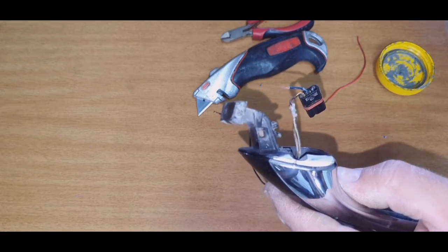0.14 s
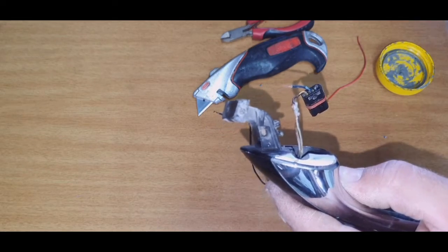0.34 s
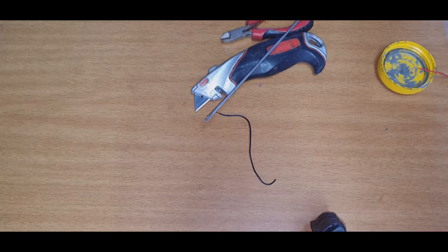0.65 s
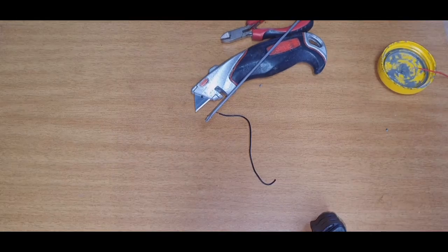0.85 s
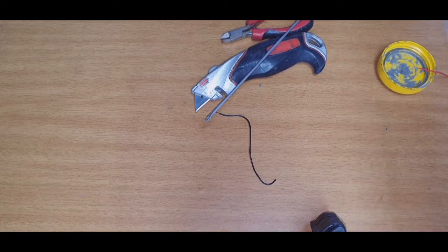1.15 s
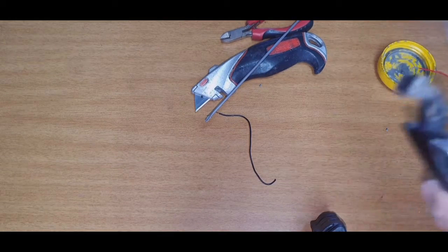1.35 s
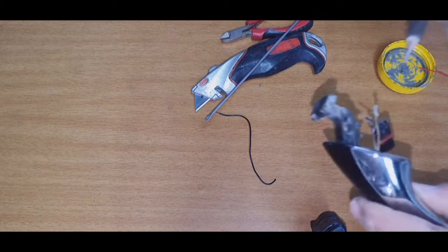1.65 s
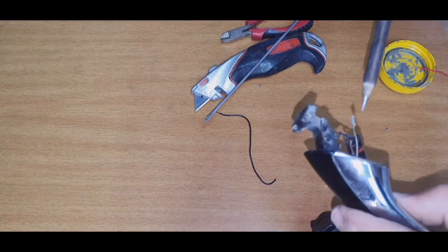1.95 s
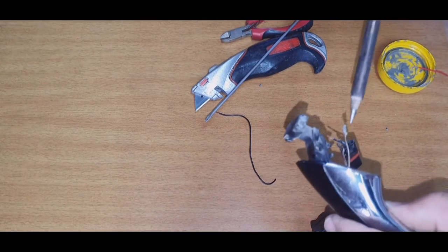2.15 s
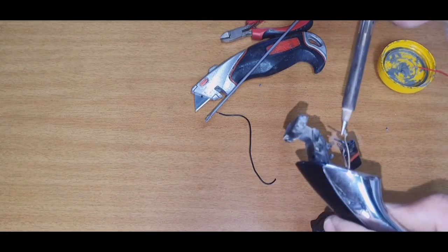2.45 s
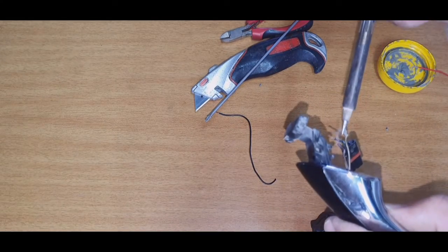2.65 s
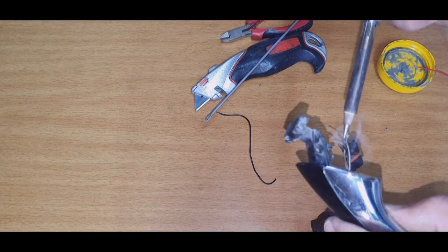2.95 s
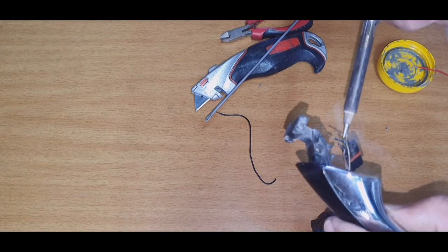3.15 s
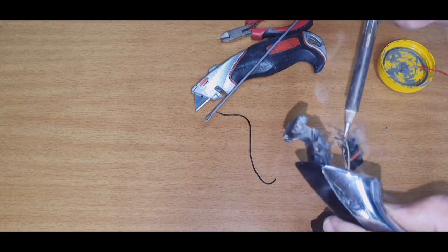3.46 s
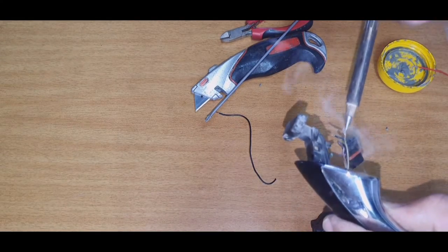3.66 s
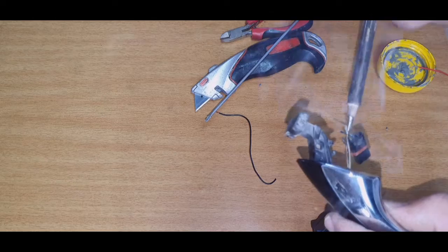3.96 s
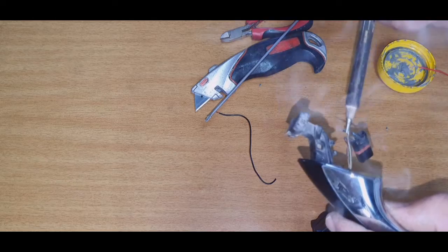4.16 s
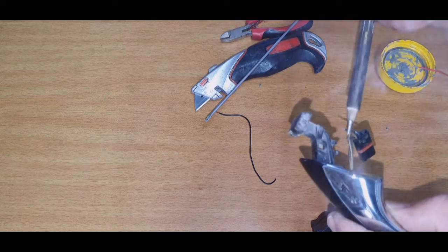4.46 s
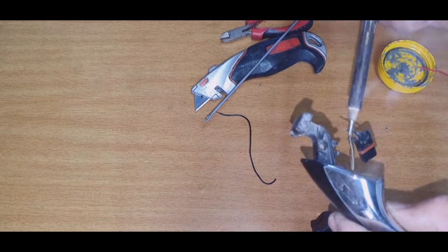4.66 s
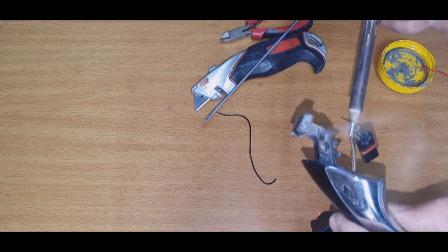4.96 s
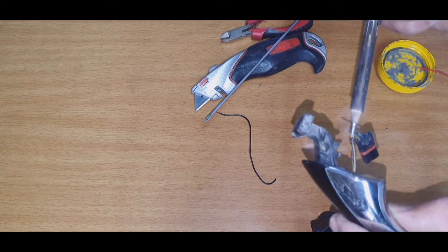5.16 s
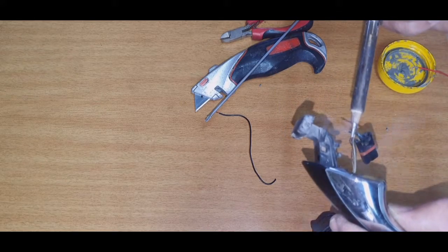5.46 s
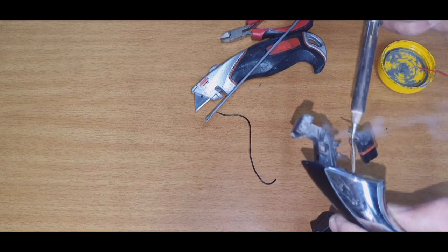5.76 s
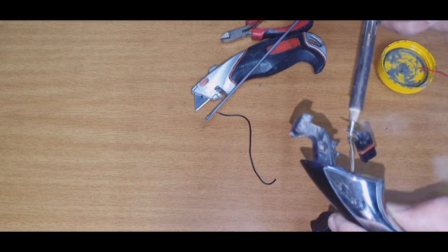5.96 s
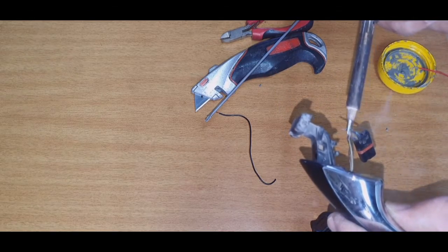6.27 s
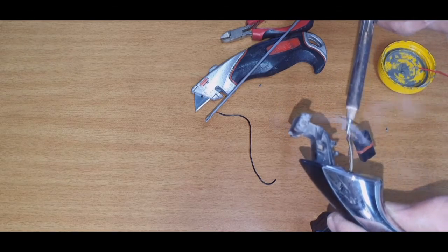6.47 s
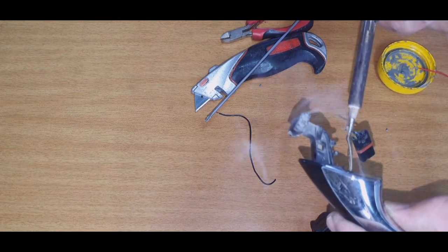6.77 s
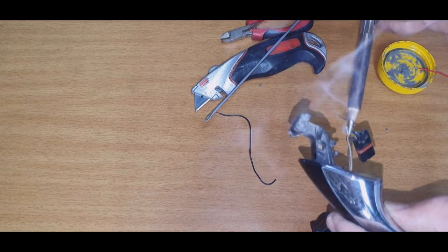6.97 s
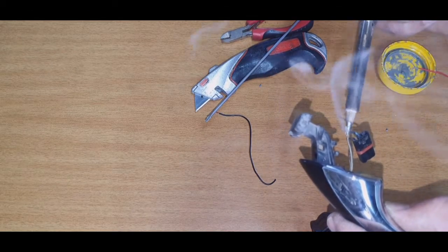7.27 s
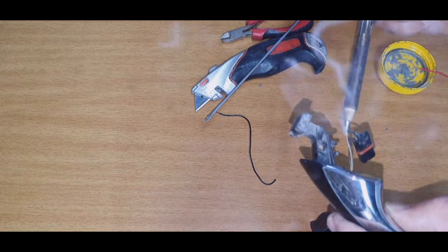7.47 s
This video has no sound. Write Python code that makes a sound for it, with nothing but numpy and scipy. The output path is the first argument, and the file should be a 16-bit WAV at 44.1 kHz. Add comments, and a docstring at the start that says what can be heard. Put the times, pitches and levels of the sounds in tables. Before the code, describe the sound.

A quiet workshop with faint machine hum. A soft knock, then a harder double knock on a wooden bench. A heavy vehicle outside slows to idle, its deep, nearly pure throb swelling and dipping under broad road roar. Close by, a soldering iron makes thin bright fizzing in bouts, with sharp little pops and one brief breathy whistle. A small stereo microphone is close to the bench.

```python
"""A workshop with a wooden bench; outside, a heavy vehicle slows to idle.
Close by, a hot iron boils flux off a wire joint: filtered clicks and noise fizz in bouts, single clicks pop,
and a breathy sine whistles once. A swelling firing tone is the exhaust, broad noise the roar from the street.
Decaying modes knock on the bench; machines hum as steady and wavering tones. A small two-port microphone hears it."""
import sys
import numpy as np
from scipy import signal
from scipy.fft import rfft, irfft, next_fast_len
from scipy.io import wavfile
from scipy.ndimage import uniform_filter1d

SR = 44100
rng = np.random.default_rng(int(sys.argv[2]) if len(sys.argv) > 2 else 0)


def store_pcm(level_fs):
    """Save levels as 16-bit WAV."""
    pcm = np.round(np.clip(level_fs, -1, 1) * 32767).astype(np.int16)
    wavfile.write(sys.argv[1], SR, np.atleast_2d(pcm).T)


N = 336163  # samples


def sizzle():
    """About 1200 tiny bubbles burst at random each second, over a fluttering jet of vapour."""
    body_gain, top_gain, bubble_share = boiling(np.arange(N) / SR)
    slow = evened(uniform_filter1d(rng.standard_normal(N), size=600))
    quick = evened(uniform_filter1d(rng.standard_normal(N), size=90))
    sizes = gain_of(2.33 * np.minimum(rng.exponential(1, N), 5))
    bursts = rng.random(N) < 1200 / SR
    bubbles = sizes * bursts * rng.choice([-1, 1], N)
    jet = gain_of(1.0 * slow + 0.85 * quick) * rng.standard_normal(N)
    clicks = np.sqrt(bubble_share) * evened(bubbles) + np.sqrt(1 - bubble_share) * evened(jet)
    body, top = fizz_ports(clicks)
    facing = np.clip(top_gain[1] / (top_gain[0] + 1e-12) - 1, 0, 1)
    # a hollow rings when the jet faces the right port, and a lower one with it at both ports
    top[1] += resonate(top[1], 15300, 550) * 2.4 * facing
    body = body + resonate(body[0], 4310, 220) * 1.02 * facing
    return simmer(body * body_gain + top * top_gain, patchy_db=1.88)


def boiling(t):
    """Gains of body and top octave and the bubble share: each bout swells in, drifts, dies away; powers add."""
    # bouts of boiling: start t/s, length t/s, fizz level/dB, change over the bout level/dB, release/(dB per s),
    # top octave relative level/dB, left-right of the top octave level/dB, power share of separate bubbles (0-1)
    bouts = [(2.194, 0.15, -64, 4, 132, 5, -3.5, 0), (2.424, 0.14, -75, -1, 120, 8, -2, 0.1),
             (2.582, 0.824, -58.5, -3.5, 278, 3, -3.5, 0.18), (3.457, 0.049, -68, -1.2, 200, 1, -1, 0.46),
             (3.941, 0.092, -58.5, 2.6, 225, 0.8, -2, .2), (4.326, 0.27, -69, -10, 198, 1.5, 1, 0.5),
             (4.512, 0.21, -61, 3.5, 115, 2, -2.5, .15), (4.784, 0.14, -65.5, -2.5, 200, 2, -1.1, 0.43),
             (4.884, 0.46, -62.5, 4, 92, 0.3, -2.5, 0.5), (5.38, 0.31, -62.5, -2, 200, 1.5, -2.5, 0.43),
             (5.673, .33, -65.5, -3.5, 200, 1.8, -1, 0.6), (5.999, .68, -62.5, -14, 92, 1, 0, 0.36),
             (6.83, .11, -78.5, 2, 87, -3, -.6, 0.38), (7.031, .19, -75.5, 5.5, 134, -1.5, -1.5, 0.42)]
    attack_s = 0.045
    top_lingers = 0.82  # the top octave dies at this share of the release speed
    body, top, bubbly = np.full(N, 1e-14), np.zeros((2, N)), np.zeros(N)
    for start, length, db, change_db, release_db, top_db, pan_db, share in bouts:
        age = t - start
        drift_db = change_db * np.clip(age / length, 0, 1)
        held = np.clip(age / attack_s, 0, 1) ** 2 * gain_of(db + drift_db)
        fall_db = release_db * np.maximum(age - length, 0)
        power = (held * gain_of(-fall_db)) ** 2
        body += power
        bubbly += share * power
        port_db = np.array([[.5], [-.5]]) * pan_db
        top += (held * gain_of(top_db - top_lingers * fall_db + port_db)) ** 2
    return np.sqrt(body), np.sqrt(top), np.clip(bubbly / body, 0, 1)


def fizz_ports(clicks, count=10):
    """Colours clicks for each port, as (body, top octave); metal near each of count spots scatters its own way."""
    # colour of the fizz, before the hollows and the bass cut: f/Hz, left level/dB per Hz, right level/dB per Hz
    fizz_colour = [(1530, -7.5, -13), (3100, -14.5, -13.5), (3420, -6, -7.5), (4500, -8, -11.5),
                   (5700, 1, -2.5), (6270, -4.5, -4.5), (7080, 0.5, -2.5), (7200, -14.5, -7.5),
                   (8000, -5, -5.5), (9940, -9.5, -5), (10400, -5, -17.5), (11900, -6.5, -3.5),
                   (14000, -7, -9), (15300, -5.5, -4.5)]
    # hollows near the joint: f/Hz, width f/Hz, left level/dB, right level/dB
    hollows = [(4315, 185, 8, 5), (5460, 170, -1.5, -7), (6044, 300, 5, -9), (13300, 480, 10, 6),
               (14000, 370, 1, 2), (14900, 460, 2, 0)]
    # how alike the ports hear: f/Hz, power share heard alike (0-1), phase lead of the right port/rad
    port_likeness = [(1500, .3, .7), (3200, .3, .3), (4300, .5, 1.2), (5200, .25, 1.2), (6200, .55, 3.2),
                     (7300, .55, 3.6), (9500, .55, 2.6), (10500, .15, 4), (15600, .3, 5.5)]
    size = next_fast_len(N + 4096)
    hz = np.fft.rfftfreq(size, 1 / SR)
    same, lead = read(port_likeness, hz)

    t, spot = np.arange(500) / SR, rng.integers(0, count, N)
    envelope = gain_of(-60 * t / 0.01) * np.minimum(t / 0.00058, 1)
    paths = rng.standard_normal((count, 2, 500)) * envelope
    paths /= np.linalg.norm(paths, axis=2, keepdims=True)
    scattered = sum(signal.oaconvolve((clicks * (spot == k))[None], paths[k], axes=1) for k in range(count))
    heard = np.sqrt(same) * rfft(clicks, size) + np.sqrt(1 - same) * rfft(scattered, size)

    ports = gain_of(read(fizz_colour, hz)) / (1 + (1400 / (hz + 1)) ** 4)
    lifts_db = sum(np.outer(lift_db, 1 / (1 + (2 * (hz - f) / width) ** 2)) for f, width, *lift_db in hollows)
    ports = ports * gain_of(lifts_db) * np.array([np.ones_like(lead), np.exp(1j * lead)])
    top = 1 / (1 + (10000 / (hz + 1)) ** 12)
    bands = [ports * (1 - top), ports * top]
    return [irfft(heard * b / np.sqrt(np.mean(abs(b) ** 2)), size)[:, :N] for b in bands]


def simmer(x, patchy_db):
    """The colour of the fizz shifts in small random patches of time and pitch, alike at both ports."""
    z = signal.stft(x, nperseg=256)[2]
    patches = uniform_filter1d(rng.standard_normal(z.shape[1:]), 3, 0)  # along pitch
    patches = evened(uniform_filter1d(patches, 14, 1))  # along time
    return signal.istft(z * gain_of(patchy_db * patches), nperseg=256)[1][:, :N]


def pops():
    """Each large bubble is one click and its echo off the bench."""
    # bubbles that burst loudly: t/s, click level/dB before colouring, top octave relative level/dB
    loud_bubbles = [(2.4793, -43, 7.5), (2.512, -43, -3), (2.955, -39, 4), (3.0012, -44, 4),
                    (3.495, -41, 9), (4.9116, -38, 2), (4.9203, -32, 4), (4.9805, -36, 8),
                    (5.0716, -39, -2), (5.1064, -40, -4), (5.136, -32, -5), (5.1871, -33, 2.2),
                    (5.2023, -32.5, 0), (5.236, -38, -2), (5.2565, -39, -3), (5.3079, -23, -4),
                    (5.3325, -39, 0), (5.4639, -34, -4), (5.5591, -30.5, -10), (5.6146, -52, 2.2),
                    (5.6459, -33.5, 6), (5.6706, -30.5, 2.2), (5.7563, -39, -2), (6.0542, -42, -1.5),
                    (6.0735, -33, 0), (6.9148, -37.5, -4), (7.1808, -41.5, -7)]
    s, db, top_db = np.transpose(loud_bubbles)
    at = np.round(s * SR).astype(int)
    low, high = np.zeros((2, N))
    low[at] = gain_of(db)
    high[at] = gain_of(db + top_db)
    echo = np.r_[-1, np.zeros(52), -.45]  # 1.2 ms later
    body = fizz_ports(np.convolve(low, echo)[:N])[0]
    top = fizz_ports(np.convolve(high, echo)[:N])[1]
    return body + top


def whistle():
    """Vapour in a gap in the solder: a breathy tone whose pitch wanders with the gap, in a diffuse band."""
    # course of the whistle: t/s, pitch f/Hz, mean level/dB before spluttering and port balance
    gap = [(3.48, 3885, -84), (3.504, 4020, -77), (3.528, 4170, -85), (3.556, 4127, -70.5),
           (3.582, 4260, -84), (3.664, 4027, -67.5), (3.692, 4160, -76), (3.734, 4100, -72),
           (3.76, 3910, -77), (3.874, 3794, -84), (3.89, 3730, -97)]
    t = np.arange(N) / SR
    hz, db = follow(gap, t)
    db += 1.4 * evened(uniform_filter1d(rng.standard_normal(N), size=500))  # the gap splutters
    breathy = evened(resonate(rng.standard_normal(N), hz, 80))
    diffuse = evened(resonate(resonate(rng.standard_normal(N), 1.1 * hz, 300), 0.95 * hz, 300))
    sine = np.sin(2 * np.pi * np.cumsum(hz) / SR)
    tone = evened(0.8 * sine + 0.27 * breathy + 0.4 * diffuse)
    first, last = gap[0][0], gap[-1][0]
    on = np.interp(t, [first - .02, first, last, last + .02], [0, 1, 1, 0])
    return tone * on * gain_of(db + np.array([[1.5], [-1.5]]))


def exhaust():
    """A nearly pure firing tone with weak orders and a rough skirt, swelling as the room resonates."""
    # the engine slows to idle: t/s, firing pitch f/Hz
    firing = [(1.75, 116.1), (2.0, 113.9), (2.35, 90.8), (2.62, 77.3), (2.82, 69.7), (3.05, 72.1),
              (3.5, 72.2), (4.2, 71.6), (4.5, 74.4), (5.0, 71.4), (5.8, 69.7), (6.5, 69.4), (7.62, 67.3)]
    # the note swells and dips as its paths through the room add and cancel: t/s, level/dB before port balance
    boom = [(1.7, -81), (1.83, -62.5), (2.18, -55), (2.28, -61), (2.35, -54), (2.46, -59), (2.614, -40),
            (2.664, -47.5), (2.786, -38), (2.922, -37.5), (3.04, -70), (3.13, -48), (3.27, -72),
            (3.48, -43), (3.55, -48), (3.82, -41), (3.86, -48.5), (4.1, -37), (4.309, -30.5), (4.51, -36),
            (4.62, -34.5), (4.85, -63), (4.94, -48), (5.13, -36), (5.26, -38.5), (5.379, -48.5),
            (5.46, -41), (5.58, -73), (5.629, -47), (5.71, -71), (5.76, -49.5), (5.869, -62), (6.02, -37),
            (6.5, -45), (6.63, -35.5), (6.8, -59), (7.03, -30), (7.2, -34), (7.36, -80), (7.42, -47),
            (7.5, -45), (7.555, -58.5), (7.62, -40.5)]
    # weak orders: multiple of the firing pitch, level/dB relative to the tone
    orders = [(2, -34.5), (3, -31.5)]
    t = np.arange(N) / SR
    hz = follow(firing, t)[0]
    s, db = np.transpose(boom)
    turns = np.cumsum(hz) / SR
    skirt = evened(resonate(rng.standard_normal(N), hz, 3.6))
    tone = np.sqrt(2) * np.sin(2 * np.pi * turns) + 0.058 * skirt
    for multiple, order_db in orders:
        tone += gain_of(order_db) * evened(resonate(rng.standard_normal(N), multiple * hz, 5.7))
    return tone * np.interp(t, s, gain_of(db), left=0) * gain_of([[-.35], [.35]])


def roar():
    """Engine and tyres: wide noise from the street whose treble and bass come and go apart from its body."""
    # course of the roar: t/s, body level/dB, treble relative level/dB
    course = [(1.45, -71, -5), (2.1, -67, 0), (2.5, -61.5, -5), (2.65, -56.5, -4), (3.4, -55.5, 4),
              (3.87, -50.5, 3), (4.3, -44.5, 1.4), (4.92, -51, 6.5), (5.09, -48.5, 5.5), (5.5, -48.5, 4.5),
              (5.56, -52.5, 6), (5.95, -52, 4), (6.15, -42.5, 1.5), (6.4, -42, 1.4), (6.7, -46, 2),
              (6.88, -52.5, 3.5), (7.25, -52, 2.5), (7.38, -57.5, 3), (7.62, -61, 6)]
    # colour before the moving tilt: f/Hz, level/dB per Hz
    roar_colour = [(30, -11.5), (60, 4.5), (110, -5), (210, -5), (300, -7), (500, -8), (800, -5.5),
                   (1150, -11), (1800, -20), (2300, -32.5), (3200, -43.5), (6000, -99)]
    # f/Hz, left-right level/dB, likeness of the ports (0-1), phase lead of the right port/rad
    roar_ports = [(150, 7.5, 1, 0), (487, 0.5, 0.87, 0.53), (975, 4.5, 0.66, 0.8), (1700, 4.5, 0.57, 1.06),
                  (2440, 5, 0.17, 0.5)]
    bass_db, gust_db = -2.3, 4  # the bass: mean lift and slow random spread

    def tilt(t, hz):
        """Level in dB at each time and pitch."""
        db, treble_db = follow(course, t)
        gusts = evened(uniform_filter1d(rng.standard_normal(len(t)), size=30))
        treble = np.clip(np.log2((hz + 1) / 800) / 0.94, 0, 1.3)
        bass = np.clip(np.log2(400 / (hz + 1)), 0, 1)
        onset_db = -60 * np.clip(course[0][0] - t, 0, 1)  # rises to the first row
        return db + treble_db * treble + (bass_db + gust_db * gusts) * bass + onset_db
    return noise(roar_colour, roar_ports, patchy_db=1.23, swell_db=0.54, tilt=tilt)


def knocks():
    """Blows crack and ring the modes of the bench; the walls answer with a short tail."""
    # blows: t/s, ring peak level/dB before port balance, crack relative level/dB, share in the walls level/dB
    blows = [(0.6, -51.5, -9.5, 5), (1.289, -27, -20, -8), (1.299, -38, -19, -23)]
    # modes of the bench: f/Hz, relative level/dB, t60/s
    bench = [(73.8, -14.5, 0.49), (168, -14, 0.14), (300, -14, 0.073), (389, 4, 0.029), (520, -17, 0.031),
             (688, -7, 0.034), (912, -4.5, 0.029), (1034, 9, 0.0097), (1310, -9, .015),
             (2000, -10.5, 0.0094), (2330, -17, 0.011)]
    # reverberation of the walls: f/Hz, t60/s
    walls = [(200, 0.32), (1000, 0.31), (4000, 0.39), (10000, 0.23)]
    t = np.arange(SR // 2) / SR
    dry, wet = np.zeros((2, N))
    for s, db, crack_db, walls_db in blows:
        ring = sum(gain_of(mode_db - 60 * t / t60) * np.sin(2 * np.pi * hz * t) for hz, mode_db, t60 in bench)
        ring = ring * np.minimum(t / 0.0021, 1)
        ring /= abs(ring).max()
        crack = gain_of(crack_db - 60 * t / .0022) * np.sin(2 * np.pi * 4500 * t)
        crack = np.roll(crack, 60)  # contact hardens after the first push
        # loose tools jump, heard by way of the walls
        rattle = resonate(resonate(rng.standard_normal(len(t)), 1200, 2300), 1200, 2300)
        rattle = rattle * gain_of(-2.5 - 60 * t / 0.0093)
        at = round(s * SR)
        dry[at:at + len(t)] += gain_of(db) * (ring + crack)
        wet[at:at + len(t)] += gain_of(db + walls_db) * (ring + rattle)

    diffuse = rng.standard_normal((2, SR // 2)) + 0.34 * rng.standard_normal(SR // 2)  # partly alike at the ports
    hz, lag, z = signal.stft(diffuse, SR, nperseg=256)
    decay = gain_of(-60 * lag / read(walls, hz)[0][:, None])
    tail = signal.istft(z * decay, SR, nperseg=256)[1]
    tail = np.pad(tail / np.linalg.norm(tail[0]), ((0, 0), (200, 0)))  # 4.5 ms after the blow
    return dry * gain_of([[1.2], [-1.2]]) + signal.oaconvolve(wet[None], tail, axes=1)[:, :N]


def workshop():
    """Air noise, machine hums and a deep wavering drone, each tone in phase at both ports."""
    # colour of the air noise: f/Hz, relative level/dB per Hz
    air_colour = [(15, -28.5), (40, -16), (100, -6.5), (190, -7), (240, -21.5), (450, -23.5), (750, -26.5),
                  (1060, -33.5), (2000, -40), (5000, -47), (5800, -41), (6600, -35.5), (7600, -43),
                  (10000, -48.5), (15700, -52.5)]
    # f/Hz, left-right level/dB, likeness of the ports (0-1), phase lead of the right port/rad
    air_ports = [(96.5, -5.5, 0.88, 0.059), (396, 8, 0.55, 0.045), (1250, 3.5, 0, 0), (4840, 0.5, 0, 0),
                 (6460, 14, 0.0038, 0.0036), (8500, 8.5, 0.1, 0.018), (10900, 0.5, 0, 0.0037)]
    # machines: f/Hz, width of the wavering f/Hz, level/dB before drift and port balance, steady power share (0-1)
    machines = [(78.5, 5.7, -63, 0.5), (155.5, 12, -64, 0.32), (201.6, 8.4, -60.5, 0.48),
                (298.5, 8.4, -75.5, 0.4), (346.4, 6.2, -84, .4), (396.4, 11, -72.5, 0.25),
                (497.3, 7.8, -78.5, 0), (578, 14, -78.5, 0), (704.7, 28, -79.5, 0.01)]
    # deep drone: t/s, level/dB
    drone = [(0.0, -71), (1.0, -76), (1.9, -61), (2.3, -72), (3.4, -63), (4.6, -64), (4.9, -73), (6.4, -82),
             (6.8, -79), (7.62, -78)]
    # slow drift of air and hums: t/s, level/dB
    drift = [(0, -2.), (1.3, -1.2), (2.5, 0.4), (7.25, 2.5), (7.4, -1.2), (7.62, 1.5)]
    t = np.arange(N) / SR
    air = gain_of(-59.5) * evened(noise(air_colour, air_ports, patchy_db=1.25, swell_db=0.47))
    hums = sum(hum(*row) for row in machines) * gain_of([[.4], [-.4]])
    deep = hum(36.6, 4.7, follow(drone, t)[0], 0.16)
    return (air + hums) * gain_of(follow(drift, t)[0]) + deep


def hum(hz, width, db, steady):
    """A steady tone blended by power with a wavering one, which is noise through two equal resonances."""
    steady = np.clip(steady, 0, 1)
    wavering = evened(resonate(resonate(rng.standard_normal(N), hz, width), hz, width))
    tone = np.sqrt(2) * np.sin(2 * np.pi * (hz * np.arange(N) / SR + rng.random()))
    return gain_of(db) * (np.sqrt(steady) * tone + np.sqrt(1 - steady) * wavering)


def noise(colour, ports, patchy_db, swell_db, tilt=lambda t, hz: 0):
    """Two-port noise from random short-time spectra with drifting patches and a shared swell."""
    frames, hz = N // 256 + 5, np.fft.rfftfreq(1024, 1 / SR)
    a, b, c, d, patches = rng.standard_normal((frames, 513, 5)).T
    patches = uniform_filter1d(patches, 10, 0)  # along pitch
    patches = evened(uniform_filter1d(patches, 12, 1))  # along time
    swell = evened(uniform_filter1d(rng.standard_normal(frames), 8))
    pan_db, same, lead = read(ports, hz)[:, :, None]
    same = np.clip(same, 0, 1)
    left = a + 1j * b
    right = np.exp(1j * lead) * (same * left + np.sqrt(1 - same ** 2) * (c + 1j * d))
    shape = gain_of(read(colour, hz)[0][:, None] + patchy_db * patches + swell_db * swell)
    z = np.array([left * gain_of(pan_db / 2), right / gain_of(pan_db / 2)]) * shape
    z /= np.sqrt(np.mean(abs(z) ** 2))
    z *= gain_of(tilt(np.arange(frames) * 256 / SR, hz[:, None]))
    return signal.istft(z, nperseg=1024, noverlap=768)[1][:, :N] / np.sqrt(1024)


def resonate(x, hz, width):
    """Shifts the curve hz down to zero, smooths, and shifts back: a resonance of gain 1."""
    turn = np.exp(2j * np.pi * np.cumsum(hz * np.ones(len(x))) / SR)
    r = np.exp(-np.pi * width / SR)
    return 2 * (turn * signal.lfilter([1 - r], [1, -r], x / turn)).real


def gain_of(db):
    """Amplitude factor of a level in dB."""
    return 10 ** (np.asarray(db) / 20)


def evened(x):
    """Scales x to an RMS of 1."""
    return x / np.sqrt(np.mean(x ** 2) + 1e-20)


def read(points, hz):
    """Columns of a spectrum table at the frequencies hz, interpolated along log frequency."""
    f, *values = np.transpose(points)
    return np.array([np.interp(np.log(hz + 1), np.log(f + 1), v) for v in values])


def follow(rows, t):
    """Columns of a curve table at the times t."""
    s, *values = np.transpose(rows)
    return [np.interp(t, s, v) for v in values]


def scene():
    """Everything that reaches the two ports, from the joint to the room."""
    return sizzle() + pops() + whistle() + exhaust() + roar() + knocks() + workshop()


def record(dry):
    """The recorder's band limit at 15770 Hz, the sound continued past both ends by odd reflection."""
    longer = np.pad(dry, ((0, 0), (1023, 1023)), "reflect", reflect_type="odd")
    lowpass = signal.firwin(2047, 15770, window=("kaiser", 9), fs=SR)
    return signal.oaconvolve(longer, lowpass[None], "valid", axes=1)


dry = scene()
out = record(dry)
store_pcm(out)
```